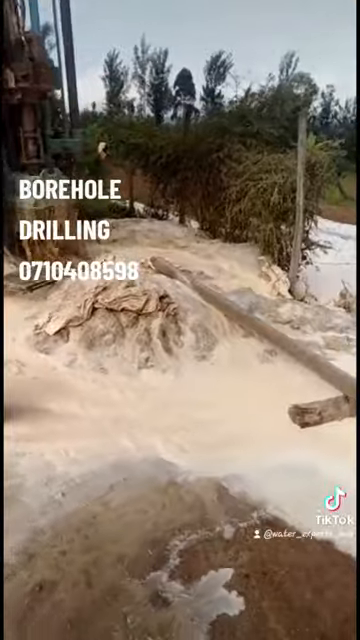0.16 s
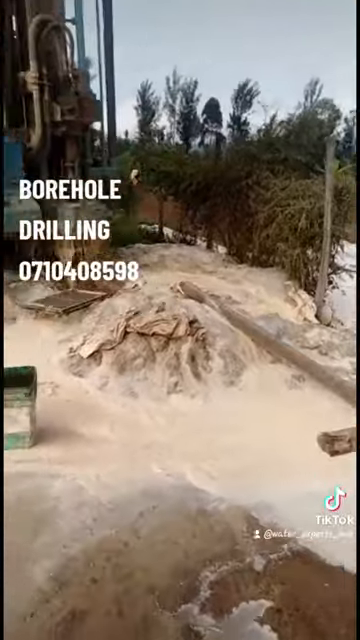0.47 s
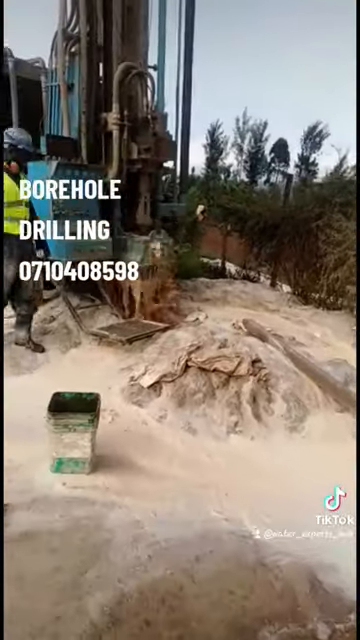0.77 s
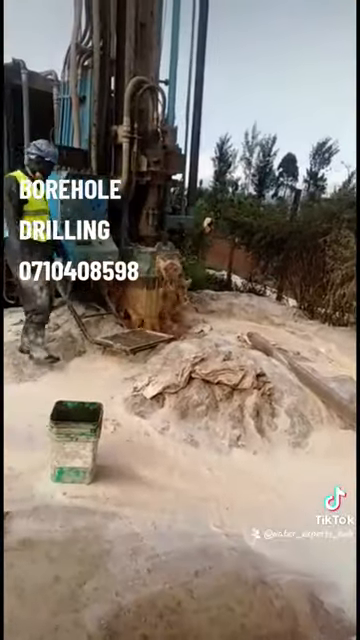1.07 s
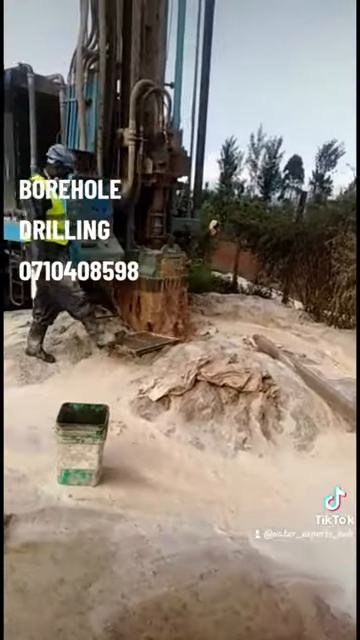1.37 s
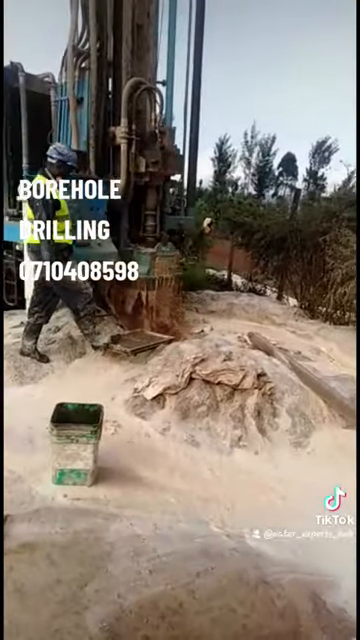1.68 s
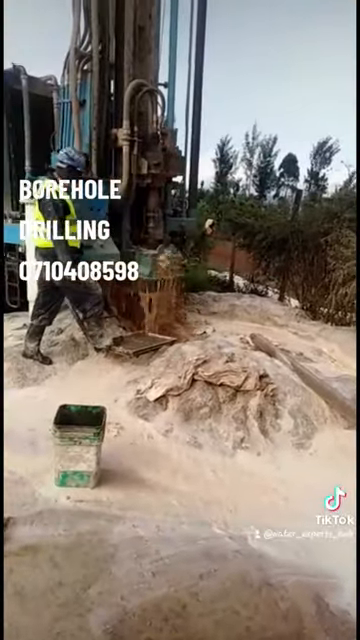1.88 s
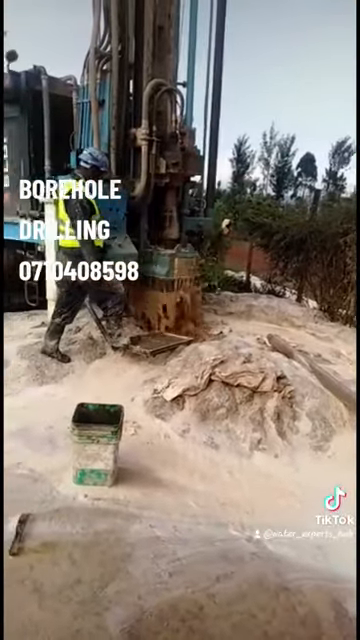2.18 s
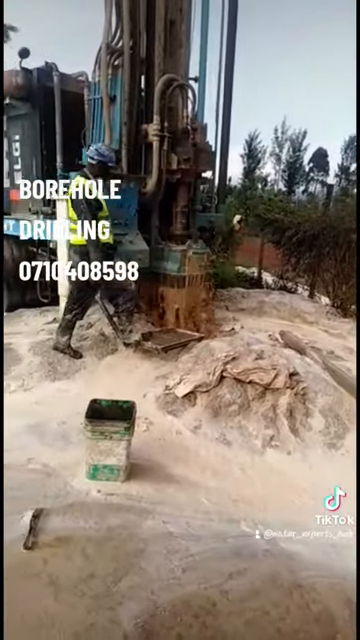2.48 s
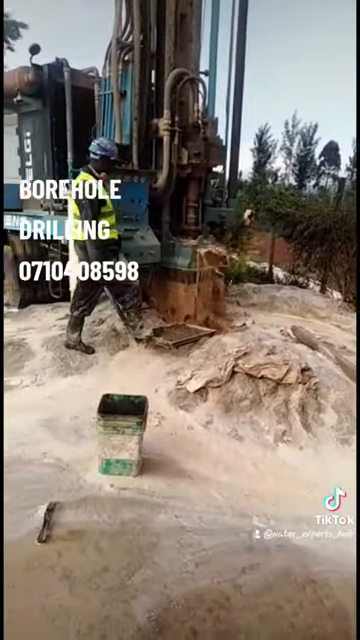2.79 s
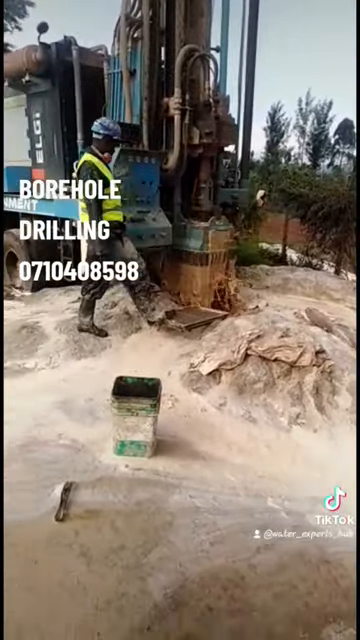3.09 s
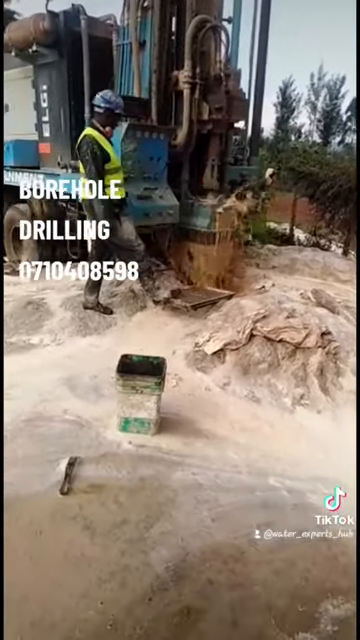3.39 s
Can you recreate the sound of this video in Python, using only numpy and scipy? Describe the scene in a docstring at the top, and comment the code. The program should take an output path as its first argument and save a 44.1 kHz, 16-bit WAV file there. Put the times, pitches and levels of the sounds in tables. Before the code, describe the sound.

Heavy drilling rig engine drone, sagging then revving up a little, over rough exhaust rumble and hiss. Uneven wet spatter, strongest early and mostly to the right, with brief dull clanks; open muddy site, handheld microphone nearby.

```python
"""A diesel's deep boom runs throughout, at the firing rate: a drilling rig at work on an open muddy site.
The six-cylinder engine is a sum of tones locked to the crank; it sags under load, then races and settles.
Exhaust and compressor roar are filtered noise, with dull knocks and a grit rattle; a short air jet whistles.
Air blows slurry from the hole as uneven gushes of random droplets; struck pipe modes clank now and then.
The treble shifts between left and right."""
import sys
import numpy as np
from scipy import signal
from scipy.fft import rfft, irfft
from scipy.io import wavfile
from scipy.ndimage import uniform_filter1d

SR = 44100
rng = np.random.default_rng(int(sys.argv[2]) if len(sys.argv) > 2 else 0)


def file_out(sig):
    """Save sig as 16-bit WAV at sys.argv[1]."""
    # one column per channel
    cols = np.atleast_2d(sig).T
    # limit, then scale
    lim = np.clip(cols, -1, 1)
    pcm = np.round(lim * 32767).astype(np.int16)
    wavfile.write(sys.argv[1], SR, pcm)


N = 156114

# Engine speed: (time [s], firing rate [Hz])
FIRING_RATE = [(0, 69), (.25, 67.9), (.6, 66.5), (1.5, 66.5), (1.8, 67.5), (2.1, 69.5), (2.4, 72.6),
               (2.65, 74.4), (2.85, 75), (3.1, 73.5), (3.3, 72.2), (3.54, 70.8)]
# Engine tones: (time [s], firing tone [dB], second harmonic [dB], third harmonic [dB],
# reference level of the crankshaft orders [dB], left-right [dB])
ENGINE_LEVELS = [(0, -15, -30, -35, -33, 2), (.25, -15.5, -30, -34, -32, 3), (.45, -15.5, -33, -33, -31, 4),
                 (.65, -15.5, -37, -28, -31, 3.5), (1.0, -16, -37.5, -29, -31, 3.8),
                 (1.35, -16.5, -38, -31, -33, 3.5), (1.6, -16.5, -39, -30, -33, 3),
                 (1.85, -15, -39, -32, -32, 2.5), (2.05, -15.5, -41, -42, -35, 3),
                 (2.2, -14.5, -41, -41, -35, 4), (2.37, -16, -33, -38, -35, 3.5),
                 (2.5, -13.5, -34, -38, -34, 3), (2.66, -12, -38, -46, -36, 2),
                 (2.85, -14, -37, -45, -35, 1.5), (3.0, -12.5, -33, -43, -33, 2),
                 (3.14, -12.6, -34, -43, -34, 2), (3.21, -16.5, -35, -43, -35, .3),
                 (3.27, -14.2, -35, -44, -35, .7), (3.34, -19, -34, -42, -35, -.4),
                 (3.39, -18.5, -33, -42, -35, 0), (3.44, -15, -34, -44, -35, 2)]
# Crankshaft orders from uneven cylinders: (multiple of the firing rate, level re reference [dB])
CRANK_ORDERS = [(2 / 3, -11), (4 / 3, 0), (3 / 2, -5), (5 / 3, -4), (7 / 3, -14), (5 / 2, -9)]
# Roar, each level within its band below: (time [s], exhaust rumble [dB], machinery hiss [dB])
ROAR_LEVELS = [(0.03, -29.5, -39), (0.16, -32.5, -45), (0.21, -36, -43.5), (0.31, -32.5, -42),
               (0.38, -36.5, -46.5), (0.63, -33, -46), (0.96, -34, -44.5), (0.99, -29, -47.5),
               (1.17, -38, -45), (1.26, -28, -53), (1.3, -37, -43.5), (1.47, -32.5, -43.5),
               (2.02, -37.5, -46), (2.47, -32.5, -47), (2.54, -35, -45.5), (2.62, -34.5, -47),
               (2.65, -40.5, -51), (2.78, -33.5, -48.5), (2.81, -37, -55), (3.12, -36, -45),
               (3.22, -38.5, -50.5), (3.5, -34.5, -44.5)]
# Exhaust rumble spectrum: (frequency [Hz], relative gain [dB])
RUMBLE_SPECTRUM = [(22, 12), (32, -0.5), (48, 9), (68, 12.5), (95, 8.5), (125, -5), (165, 1), (250, -4),
                   (400, -4.5), (500, -9.5), (700, -14), (900, -20.5), (1300, -28.5), (2500, -49)]
# Machinery hiss spectrum: (frequency [Hz], relative gain [dB])
HISS_SPECTRUM = [(530, -8), (900, -8.5), (1100, -1), (1250, -9.5), (1470, -10), (1910, -10.5), (3420, -7.5),
                 (4360, -14.5), (6700, -19.5), (12800, -32.5), (14400, -47)]
# Casing resonances, in hiss and spray: (frequency [Hz], width [Hz], gain [dB])
CASING_MODES = [(1127, 18, 7.5), (1507, 25, 11.5), (1732, 110, 6), (2160, 29, 3.5), (2680, 57, 4.5),
                (3076, 21, 9), (3500, 26, 7.5), (4550, 60, -3), (4900, 88, 5.5)]
# Treble balance: (time [s], left-right [dB])
TREBLE_PAN = [(0, 0.5), (.5, 4.5), (1.5, 2), (2.5, 8), (3.1, 6.5), (3.3, -2.5), (3.54, 2)]
# Slurry gushes: (time [s], level before CREST_DB is taken off [dB], decay length [s],
# brightness: treble up and bass down by this [dB], left-right [dB])
GUSHES = [(0.123, -28, 0.034, 5.5, 20), (0.164, -37.5, 0.12, 1.5, 20.5), (0.309, -23.5, 0.041, 0.5, 15),
          (0.346, -31, 0.071, -2, 16), (0.402, -38, 0.11, 3.5, 20), (0.56, -26, 0.04, -3.5, 6),
          (0.604, -30.5, 0.036, -9.5, -1), (0.635, -37, 0.085, -9.5, 13.5), (0.767, -30.5, 0.091, -7, 3.5),
          (0.834, -39.5, 0.078, -10, 18.5), (0.947, -33, 0.093, -6, 9.5), (1.012, -29.5, 0.048, -1.5, 11.5),
          (1.064, -30.5, 0.079, 1.5, 14.5), (1.18, -28.5, 0.056, -3.5, 10), (1.232, -25.5, 0.058, -2.5, 0),
          (1.318, -27, 0.063, -3, 4.5), (1.402, -33, 0.047, 1.5, 12.5), (1.468, -37, 0.07, -7, 14),
          (1.576, -42.5, 0.036, 12, 12), (1.624, -31.5, 0.095, -1.5, 6.5), (1.74, -38, 0.1, 0, 10),
          (1.826, -36, 0.083, -3, 7.5), (1.89, -35, 0.086, -0.5, 11.5), (2.012, -37, 0.06, 5, 3),
          (2.105, -34.5, 0.063, -7.5, 15), (2.185, -33, 0.043, -1.5, 21), (2.322, -30.5, 0.04, -9, 9.5),
          (2.384, -41, 0.062, -11, 4), (2.429, -37, 0.053, -10, 14), (2.58, -47, 0.043, -15, 14.5),
          (2.635, -52, 0.047, -19, 13), (2.764, -45.5, 0.059, -12, -8), (2.833, -46.5, 0.044, -12.5, 17.5),
          (3.008, -41.5, 0.085, -7, 17.5), (3.06, -41.5, 0.079, 5.5, 14), (3.134, -53, 0.038, -5, 2),
          (3.243, -47, 0.048, 4, -9), (3.3, -38, 0.069, -8, 2), (3.49, -46, 0.059, 13, 6)]
# Droplet spray spectrum: (frequency [Hz], relative gain [dB])
SPRAY_SPECTRUM = [(250, 3), (700, 11), (1500, -6.5), (2400, -3), (3300, 1.5), (4500, -3.5), (7000, -4.5),
                  (10000, -9.5), (14500, -18)]
# Pipe clanks: (time [s], peak before panning [dB], pitch region struck [Hz])
CLANKS = [(.313, -22.5, 680), (.316, -32, 1750), (0.317, -37, 2650), (.34, -39, 2650), (.352, -34, 1130),
          (.385, -35, 1130), (0.458, -37, 2650), (.535, -27, 680), (0.581, -33, 1130), (0.582, -34, 1720),
          (.627, -30, 700), (0.651, -26, 1130), (.655, -32, 1485), (.711, -27, 680), (.795, -32, 1130),
          (0.82, -33, 1750), (.875, -34, 1130), (.965, -27, 1130), (1.185, -32, 1130), (2.301, -29, 600),
          (2.311, -33, 1485), (2.449, -31, 1710), (3.038, -33, 1250)]
# Drill pipe modes: (frequency [Hz], level [dB], t60, capped in clanks [s])
PIPE_MODES = [(399, 5, 0.17), (468, 4, 0.13), (582, 14, 0.11), (683, -0.5, 0.048), (788, -11.5, 0.017),
              (1116, -10, 0.025), (1180, -12.5, 0.082), (1400, -10.5, 0.06), (1713, -13.5, 0.028),
              (1930, -10, 0.065), (2622, -7, .1), (3380, -25, 0.02), (3305, 0, 0.13), (3825, 9.5, 0.025)]
# Whistling air jet: (time [s], length [s], level before panning [dB], centre [Hz], width [Hz])
JET = (3.055, .052, -49, 7400, 1300)
# Left-right likeness: (frequency [Hz], likeness [0-1])
LIKENESS = [(30, .97), (100, 0.89), (300, 1), (700, 0.72), (1400, 0.18), (3000, 0.35), (6000, 0.24),
            (10000, 0.048), (14000, 0.67)]

LAG_S = 0.0003  # the left side hears later
LOWPASS_HZ = 14200
WOBBLE_RMS_DB, ORDER_WOBBLE_RMS_DB, JITTER_RMS_HZ = 0.2, 2.5, 0.18
FOURTH_RE_THIRD_DB = -12
RUMBLE_BAND_HZ, HISS_BAND_HZ = (230, 900), (2000, 4500)
RUMBLE_PUFF_DEPTH, HISS_PUFF_DEPTH = 0.06, 0.2
DEEP_HZ, DEEP_DB = 220, -36  # below this pitch the rumble ignores its level table
KNOCKS_PER_S, KNOCK_SPREAD_DB, KNOCK_SHARE = 200, 4, 1.1
RATTLE_RE_HISS_DB, RATTLES_PER_S, RATTLE_SPREAD_DB = -1.5, 700, 1
RISE_S, DROPS_PER_S, DROP_SPREAD_DB = 0.038, 6000, 2.5
SPUTTER_RMS_DB, CREST_DB = 2.0, 9
SCRAPE_S, CLANK_MAX_T60_S, REACH_DB_PER_OCT2 = 0.004, 0.05, -200


def gain_of(db):
    """Amplitude ratio of a level in dB."""
    return 10 ** (np.asarray(db) / 20)


def evened(x):
    """Scales to rms 1."""
    return x / np.sqrt(np.mean(x ** 2) + 1e-20)


def read(points, hz):
    """Reads a frequency table, linear over log frequency."""
    f, value = np.transpose(points)
    return np.interp(np.log(hz + 1), np.log(f + 1), value)


def curves(table):
    """Each column of a table, joined by straight lines in time."""
    time_s, *columns = np.transpose(table)
    return [np.interp(np.arange(N) / SR, time_s, column) for column in columns]


def wander(top_hz):
    """Random drift of rms 1: sines from a tenth of top_hz up to top_hz."""
    t = np.arange(0, N + 64, 64) / SR
    slow = sum(np.sin(2 * np.pi * (f * top_hz * t + rng.random())) / np.sqrt(f)
               for f in np.geomspace(0.1, 1, 16))
    return np.interp(np.arange(N) / SR, t, evened(slow))


def colour(x, spectrum, lo_hz, hi_hz, modes=()):
    """Filters by a spectrum and resonances; rms 1 between lo_hz and hi_hz."""
    hz = np.fft.rfftfreq(N, 1 / SR)
    modes_db = sum(db / (1 + (2 * (hz - f) / width) ** 2) for f, width, db in modes)
    z = rfft(x) * gain_of(read(spectrum, hz) + modes_db)
    in_band = irfft(z * (hz > lo_hz) * (hz < hi_hz), N)
    return irfft(z, N) / np.std(in_band)


def pair(a, b, pan_db):
    """Stereo: a reaches both sides, the left one later; b reaches only the right."""
    hz = np.fft.rfftfreq(N, 1 / SR)
    same = np.clip(read(LIKENESS, hz), 0, 1)
    left = irfft(rfft(a) * np.exp(-2j * np.pi * hz * LAG_S), N)
    right = irfft(same * rfft(a) + np.sqrt(1 - same ** 2) * rfft(b), N)
    return np.array([left * gain_of(pan_db / 2), right * gain_of(-pan_db / 2)])


def patchy(patchy_db, flicker_db):
    """Two unrelated noises that share drifting time-frequency patches and a flicker of level."""
    z = signal.stft(rng.standard_normal((2, N)), nperseg=512)[2]
    patches = uniform_filter1d(rng.standard_normal(z.shape[1:]), size=5, axis=0)
    patches = evened(uniform_filter1d(patches, size=6, axis=1))
    noise = signal.istft(z * gain_of(patchy_db * patches), nperseg=512)[1][:, :N]
    return noise * gain_of(flicker_db * wander(30))


def ring(hz, db, t60_s):
    """One pipe mode: a sine dying exponentially, 60 dB in t60_s."""
    t = np.arange(SR // 4) / SR
    return gain_of(db - 60 * t / t60_s) * np.sin(2 * np.pi * hz * t)


def knocks():
    """Dull knocks of the drill string: random signed impulses, high-passed off the deepest bass."""
    strengths = gain_of(KNOCK_SPREAD_DB * np.minimum(rng.exponential(1, N), 4))
    taps = strengths * (rng.random(N) < KNOCKS_PER_S / SR)
    highpass = signal.butter(2, 220, "high", fs=SR, output="sos")
    return evened(signal.sosfilt(highpass, taps * rng.choice([-1., 1.], N)))


def rattle(puff):
    """Grit and loose parts tap the pipe, one mode at a time, more often at each firing."""
    strengths = gain_of(RATTLE_SPREAD_DB * np.minimum(rng.exponential(1, N), 5))
    taps = strengths * (rng.random(N) < RATTLES_PER_S / SR * (1 + 0.3 * puff))
    which = rng.integers(0, len(PIPE_MODES), N)
    return evened(sum(signal.oaconvolve(taps * (which == k), ring(*mode))[:N]
                      for k, mode in enumerate(PIPE_MODES)))


def roar(turns, engine_pan_db):
    """Exhaust rumble and machinery hiss, noise that puffs with the firings, plus pipe rattle."""
    rumble_db, hiss_db = curves(ROAR_LEVELS)
    puff, pan_db = np.sin(2 * np.pi * turns), curves(TREBLE_PAN)[0]
    rumble = [colour(x + KNOCK_SHARE * np.std(x) * knocks(), RUMBLE_SPECTRUM, *RUMBLE_BAND_HZ)
              for x in patchy(patchy_db=0.0, flicker_db=0.4)]
    hiss = [colour(x, HISS_SPECTRUM, *HISS_BAND_HZ, CASING_MODES)
            for x in patchy(patchy_db=2.0, flicker_db=1.5)]
    rumble = pair(*rumble, engine_pan_db + 2.5)
    deep = signal.sosfiltfilt(signal.butter(2, DEEP_HZ, fs=SR, output="sos"), rumble)
    upper = (rumble - deep) * gain_of(rumble_db) * (1 + RUMBLE_PUFF_DEPTH * puff)
    hiss = pair(*hiss, pan_db) * gain_of(hiss_db) * (1 + HISS_PUFF_DEPTH * puff)
    loose = pair(rattle(puff), rattle(puff), pan_db + 3.5) * gain_of(hiss_db + RATTLE_RE_HISS_DB)
    return deep * gain_of(DEEP_DB) + upper + hiss + loose


def jet():
    """A whistling air jet: a band of noise that swells and stops."""
    start_s, length_s, db, hz, width_hz = JET
    u = np.clip((np.arange(N) / SR - start_s) / length_s, 0, 1)
    bandpass = signal.butter(2, [hz - width_hz / 2, hz + width_hz / 2], "band", fs=SR, output="sos")
    band = signal.sosfilt(bandpass, rng.standard_normal((2, N)))
    return pair(*evened(band), 11) * gain_of(db) * np.sqrt(np.sin(np.pi * u))


def slurry():
    """Dense random droplets over a little noise, swelling and dying with each gush."""
    strengths = gain_of(DROP_SPREAD_DB * np.minimum(rng.exponential(1, (2, N)), 5))
    drops = strengths * (rng.random((2, N)) < DROPS_PER_S / SR)
    drops = drops * rng.choice([-1., 1.], (2, N)) + 0.12 * rng.standard_normal((2, N))
    wet = pair(*[colour(d, SPRAY_SPECTRUM, 4000, 14000, CASING_MODES) for d in drops], 0)
    top = signal.sosfiltfilt(signal.butter(1, 5000, "high", fs=SR, output="sos"), wet)
    t, dull_power, bright_power = np.arange(N) / SR, np.zeros((2, N)), np.zeros((2, N))
    for start_s, db, length_s, tilt_db, pan_db in GUSHES:
        u = np.maximum(t - start_s + RISE_S / 2, 0)
        sides_db = np.array([[pan_db], [-pan_db]]) / 2
        shape = (1 - np.exp(-u / RISE_S)) * np.exp(-(u / length_s) ** 2)
        swell = gain_of(db - CREST_DB + sides_db) * shape
        dull_power += (swell * gain_of(-tilt_db)) ** 2
        bright_power += (swell * gain_of(tilt_db)) ** 2
    low_sputter, top_sputter = (gain_of(SPUTTER_RMS_DB * wander(100)) for _ in range(2))
    return (wet - top) * np.sqrt(dull_power) * low_sputter + top * np.sqrt(bright_power) * top_sputter


def pipe():
    """Each clank is a gritty blow that briefly rings the pipe modes near the region struck."""
    t, out = np.arange(SR // 50) / SR, np.zeros(N + SR)
    for start_s, db, struck_hz in CLANKS:
        blow = np.sin(2 * np.pi * struck_hz * t) + 1.2 * rng.standard_normal(len(t))
        body = sum(ring(hz, mode_db + REACH_DB_PER_OCT2 * np.log2(hz / struck_hz) ** 2,
                        min(t60_s, CLANK_MAX_T60_S))
                   for hz, mode_db, t60_s in PIPE_MODES)
        sound = signal.fftconvolve(blow * np.exp(-t / SCRAPE_S), body)
        out[round(start_s * SR):][:len(sound)] += gain_of(db) * sound / abs(sound).max()
    return pair(out[:N], out[:N], 9.9)


def engine(hz, turns, tone_db, second_db, third_db, orders_db, pan_db):
    """Firing tone, harmonics and crankshaft orders, phase-locked; all but the fourth waver in level."""
    heard = np.array([turns - hz * LAG_S, turns])  # firing cycles, left and right

    def order(multiple, db, start_cycles=0.):
        """A cosine at a multiple of the firing rate, with rms level db."""
        return np.sqrt(2) * gain_of(db) * np.cos(2 * np.pi * (multiple * heard + start_cycles))
    tones = order(1, tone_db + WOBBLE_RMS_DB * wander(25))
    tones = tones + order(2, second_db + ORDER_WOBBLE_RMS_DB * wander(12), 0.5)
    tones = tones + order(3, third_db + WOBBLE_RMS_DB * wander(12))
    tones = tones + order(4, third_db + FOURTH_RE_THIRD_DB)
    for multiple, db in CRANK_ORDERS:
        level_db = orders_db + db + ORDER_WOBBLE_RMS_DB * wander(4.9)
        tones = tones + order(multiple, level_db, rng.random())
    return tones * gain_of([pan_db / 2, -pan_db / 2])


def scene():
    """Sums the sources; the engine's phase also drives the roar."""
    hz = curves(FIRING_RATE)[0]
    *levels_db, pan_db = curves(ENGINE_LEVELS)
    turns = np.cumsum(hz + JITTER_RMS_HZ * wander(15)) / SR  # in firing cycles
    return roar(turns, pan_db) + jet() + slurry() + pipe() + engine(hz, turns, *levels_db, pan_db)


def record(dry):
    """Band limit: a steep linear-phase low-pass."""
    lowpass = signal.firwin(511, LOWPASS_HZ, window=("kaiser", 9), fs=SR)
    return signal.oaconvolve(dry, lowpass[None], "same")


dry = scene()
out = record(dry)
file_out(out)
```